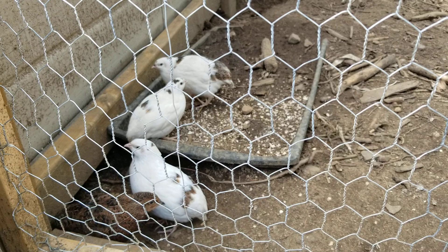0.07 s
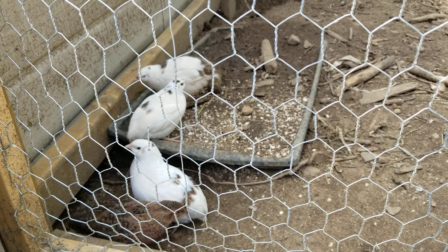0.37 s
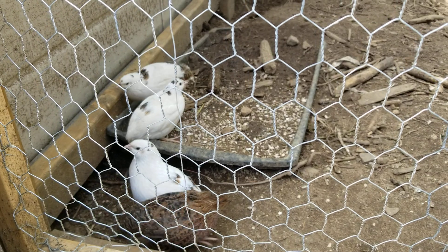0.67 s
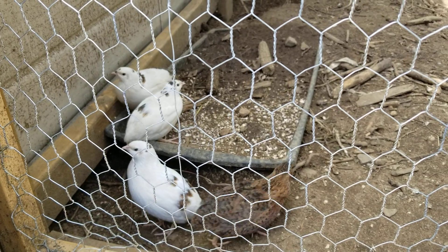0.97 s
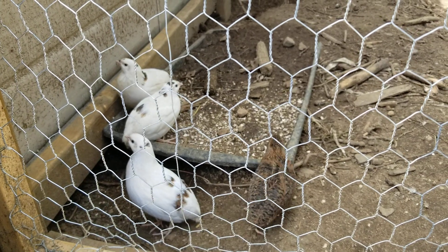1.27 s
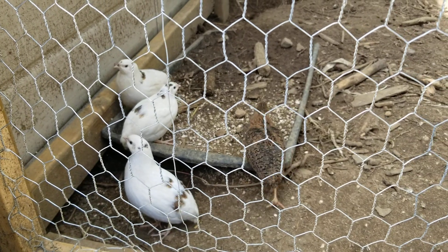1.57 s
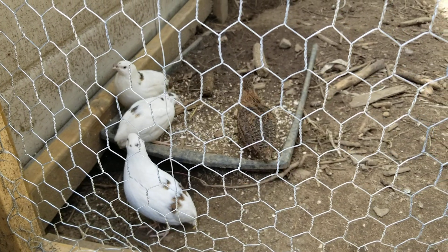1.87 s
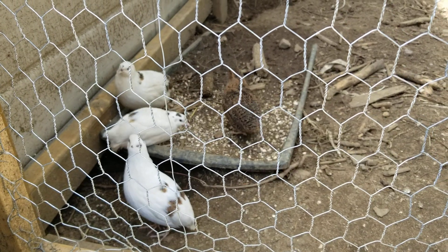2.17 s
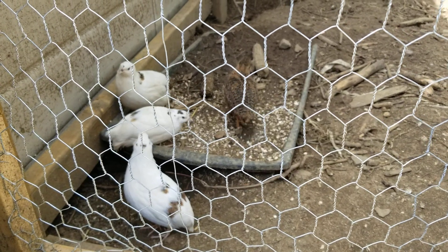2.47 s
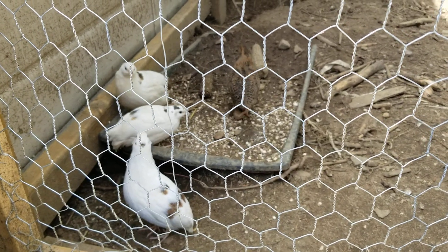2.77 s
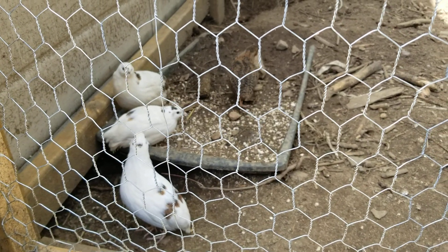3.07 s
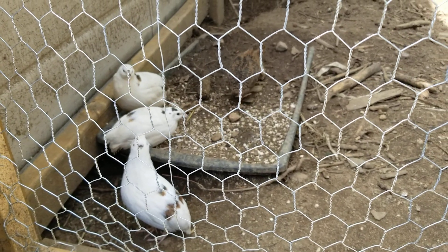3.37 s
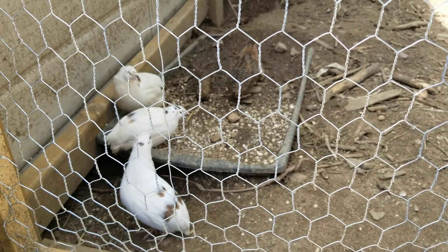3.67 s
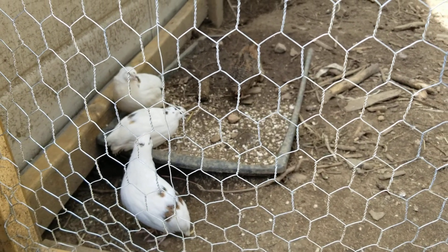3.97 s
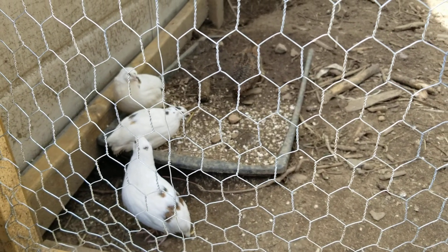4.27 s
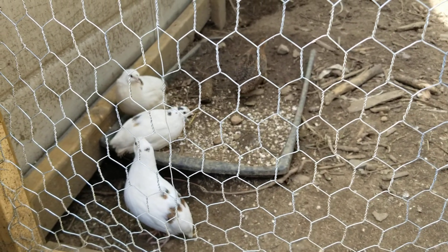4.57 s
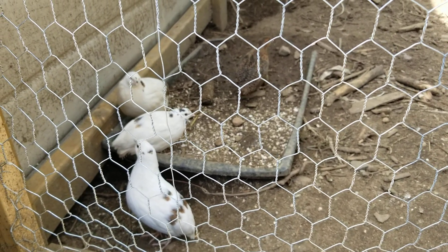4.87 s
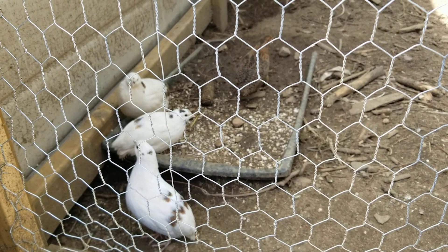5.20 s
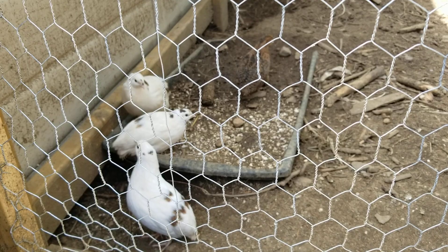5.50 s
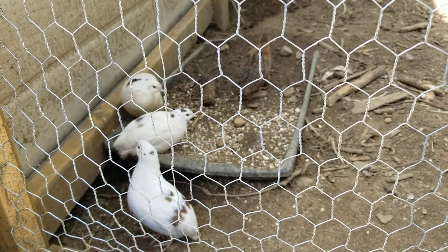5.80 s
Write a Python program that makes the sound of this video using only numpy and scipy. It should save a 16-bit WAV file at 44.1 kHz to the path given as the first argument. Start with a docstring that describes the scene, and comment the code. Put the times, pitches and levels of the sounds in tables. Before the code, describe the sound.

A low rumble of distant traffic with soft road hiss runs throughout, around an outdoor quail pen. It starts quietly. At about 0.7 seconds a far songbird gives a falling whistle that echoes around the yard. From 0.9 to 1.3 seconds quail feet tick and scratch on a feed tray, ringing lightly, with a few dull bumps and one more tick at 1.6. Around 2 seconds there is a faint high swish, and the whole scene grows clearly louder, with a short click at 2.4. Thin, very high bird calls come near 3 seconds, along with two brief chips. Another falling whistle sounds at 4 seconds. From 4.3 to 5.4 a songbird sings four quick arched notes, two louder rising swoops and a fading downward sweep. More thin calls overlap it, and a few tray ticks follow at 5.5. The right side sounds muffled.

```python
"""Quail pen with songbirds and distant traffic

Quail potter about a wire pen, their feet ringing the modes of a feed tray, over a rumble of traffic.
Songbirds give two long falling whistles and a swooping phrase, near sines from the syrinx that echo
round the yard; small birds add thin, very high calls. The right microphone is muffled, and the level
of the scene comes up at about two seconds."""
import sys
import numpy as np
from scipy import signal
from scipy.fft import rfft, irfft
from scipy.io import wavfile

SR = 44100
rng = np.random.default_rng(int(sys.argv[2]) if len(sys.argv) > 2 else 0)


def put_to_file(sound):
    """Save the sound as 16-bit audio at rate SR, in the file named by the first command-line argument."""
    columns = np.atleast_2d(sound).T  # one column per channel
    safe = np.clip(columns, -1, 1)
    whole_steps = np.round(safe * 32767)
    wavfile.write(sys.argv[1], SR, whole_steps.astype(np.int16))


N = 266364
TIME = np.arange(N) / SR
FREQ = np.fft.rfftfreq(N, 1 / SR)
PROGRESS = np.linspace(0, 1, 64)  # from the start of a note to its end


def undb(db):
    """Amplitude ratio of a level in decibels."""
    return 10 ** (np.asarray(db) / 20)


def unit(x):
    """Normalisation to an rms of 1."""
    return x / np.sqrt(np.mean(x ** 2))


def curves(rows):
    """Linear interpolation of each column against the first, time_s."""
    times, *columns = np.transpose(rows)
    return [np.interp(TIME, times, column) for column in columns]


def colour(x, points):
    """Spectral shaping by (frequency_hz, gain_db) points."""
    hz, db = np.transpose(points)
    return irfft(rfft(x) * undb(np.interp(np.log(FREQ + 1), np.log(hz), db)), N)


def resonate(x, hz, width_hz):
    """A second-order resonance with unit gain at its centre."""
    return signal.lfilter(*signal.iirpeak(hz, hz / width_hz, fs=SR), x)


def walk(rate_hz):
    """Random fluctuation: low-passed noise with an rms of 1."""
    return unit(irfft(rfft(rng.standard_normal(N)) * np.exp(-(FREQ / rate_hz) ** 2), N))


def decay(start_s, t60_s):
    """Exponential decay from start_s, by 60 dB in t60_s."""
    age = TIME - start_s
    return (age >= 0) * np.exp(-np.log(1000) * np.clip(age / t60_s, 0, 10))


# spectrum of far engines: frequency_hz, gain_db
RUMBLE_SPECTRUM = [(13, -60), (22, -53), (53, 0), (75, 1), (135, -1), (228, -12), (300, -12.5),
                   (508, -19.5), (600, -17.5), (780, -17.5), (1320, -120)]
# spectrum of road noise and outdoor hiss: frequency_hz, gain_db
ROAD_SPECTRUM = [(120, -3), (235, -6.5), (450, -10.5), (680, -2.5), (950, -1.5), (1300, -2), (1850, -3.5),
                 (2400, -10), (3700, -10.5), (4500, -12.5), (5300, -12.5), (6400, -7), (7000, -11.5),
                 (7700, -21.5), (8800, -27.5), (9700, -21), (12000, -26.5), (15500, -41)]
# swell and ebb of the traffic: time_s, rumble_gain_db, road_gain_db
TRAFFIC_SWELL = [(0, 4, 1.5), (1.5, 0.5, -1.5), (3.0, 2, 0), (4.2, 2.5, -0.15), (6, 1, 0)]
# one distant engine: time_s, pitch_hz, level_db
ENGINE_DRONE = [(0, 153.2, -52.5), (2.7, 154.1, -55.5), (3.4, 145, -59.5), (3.9, 129, -57.5),
                (5.4, 124.7, -57.5), (6, 129, -64)]
def traffic():
    """Engine rumble and drone reach both microphones alike; road noise forms a diffuse field."""
    rumble_db, road_db = curves(TRAFFIC_SWELL)
    eddies_db = 0.9 * walk(8)
    rumble = unit(colour(rng.standard_normal(N), RUMBLE_SPECTRUM)) * undb(-48.5 + rumble_db + eddies_db)
    drone_hz, drone_db = curves(ENGINE_DRONE)
    phase = 2 * np.pi * np.cumsum(drone_hz * (1 + 0.0252 * walk(17.2))) / SR
    drone = np.sin(phase) * undb(drone_db + 3.5 * walk(9.3))
    diffuse = unit(colour(rng.standard_normal((2, N)), ROAD_SPECTRUM))
    # long waves are partly coherent between the microphones
    coherent = colour(diffuse[0] + diffuse[1], [(300, -15.5), (700, -18), (1400, -24), (3000, -55)])
    road = unit(diffuse + coherent) * undb(-46 + road_db + 0.54 * walk(2.9))
    return rumble + drone + road


def syrinx(notes, waver, flutter_db, rasp, edge_s):
    """A gliding sine with random frequency and amplitude modulation; fast jitter makes it rasp."""
    out = np.zeros(N)
    pitch_ratio = 1 + waver * walk(82) + rasp * walk(1500)
    tremble_db = flutter_db * walk(70)
    for times, hz, db in notes:
        on = (TIME >= times[0]) & (TIME <= times[-1])
        t = TIME[on]
        phase = 2 * np.pi * np.cumsum(np.interp(t, times, hz) * pitch_ratio[on]) / SR
        edges = np.clip(np.minimum(t - times[0], times[-1] - t) / edge_s, 0, 1)
        out[on] += edges * undb(np.interp(t, times, db) + tremble_db[on]) * np.sin(phase)
    return out


# lower voice of the thin calls, one contour a call: time_s, pitch_hz, level_db
LOWER_VOICE = [
    [(0.575, 11000, -84), (0.657, 11569, -86), (0.801, 11273, -80), (0.835, 12500, -76),
     (0.877, 12454, -76), (0.947, 10638, -74), (0.98, 10045, -89)],
    [(2.71, 9748, -72), (2.75, 11600, -59), (2.804, 11630, -65), (2.88, 10950, -60.5), (2.902, 11408, -73),
     (2.914, 11779, -64), (2.956, 10842, -65), (3.018, 10500, -75), (3.07, 9987, -74)],
    [(4.968, 9530, -70), (4.996, 10945, -67), (5.106, 11500, -77), (5.186, 11797, -67), (5.232, 11350, -74),
     (5.254, 11100, -70), (5.4, 10202, -84)],
    [(5.47, 10456, -68), (5.494, 11150, -58), (5.513, 10093, -83)],
]
# flat-topped arches above the long calls: start_s, length_s, top_hz, level_db
UPPER_ARCHES = [(.445, .565, 13800, -89), (2.76, .45, 12600, -78), (4.951, .485, 13270, -73.5)]
def small_birds():
    """Biphonation: one side of the syrinx gives a firm lower voice, the other a broken upper one."""
    stray_ratio = 1 + 0.011 * walk(16)
    breaks_db = 5 * walk(22)
    sag = np.abs(2 * PROGRESS - 1) ** 3.6  # the higher the power, the flatter the top
    arches = []
    for start_s, length_s, top_hz, level_db in UPPER_ARCHES:
        times = start_s + length_s * PROGRESS
        hz = (top_hz - 2500 * sag) * np.interp(times, TIME, stray_ratio)
        db = level_db - 3 * sag + np.interp(times, TIME, breaks_db)
        arches.append((times, hz, db))
    calls = [np.transpose(call) for call in LOWER_VOICE]
    lower = syrinx(calls, waver=0.003, flutter_db=3, rasp=0.01, edge_s=0.005)
    upper = syrinx(arches, waver=0.0018, flutter_db=2, rasp=0.013, edge_s=0.0069)
    airy_edge = [(times, hz * 1.2, db - 2) for times, hz, db in arches]
    sizzle = syrinx(airy_edge, waver=0.015, flutter_db=3, rasp=0.035, edge_s=0.03)
    # inverse gain: the contour levels are as heard, after the level of the scene comes up
    return (lower + upper + sizzle) / undb(curves(OVERALL_GAIN)[0])


def glide(start_s, length_s, first_hz, last_hz, level_db, bend, taper_db):
    """Exponential glide as (times, hz, db): early if bend > 0, late if bend < 0, softer at the ends."""
    slide = np.expm1(-bend * PROGRESS) / np.expm1(-bend)
    hz = first_hz + (last_hz - first_hz) * slide
    db = level_db - taper_db * (2 * PROGRESS - 1) ** 2
    return start_s + length_s * PROGRESS, hz, db


# two long whistles and two brief chips: start_s, length_s, first_hz, last_hz, level_db
FALLING_WHISTLES = [(0.65, .18, 3680, 2394, -40), (2.854, 0.038, 7080, 6650, -44.5),
                    (3.632, .027, 3600, 3200, -46), (3.986, .235, 3774, 2176, -39.5)]
def far_birds():
    """Nearly pure tones that sweep down almost linearly in frequency."""
    notes = [glide(*row, bend=0.207, taper_db=7) for row in FALLING_WHISTLES]
    return syrinx(notes, waver=0.004, flutter_db=2.5, rasp=0.0057, edge_s=0.0044)


# dull bumps on the pen: start_s, level_db, pitch_hz, t60_s
PEN_KNOCKS = [(.906, -35.5, 678, 0.062), (1.063, -36.5, 794, .08), (1.071, -35, 607, 0.072),
              (2.430, -23, 500, 0.0084), (2.433, -25, 1690, .007)]
def pen_knocks():
    """Each impact excites one damped mode; the longer rings also build up more slowly."""
    out = np.zeros(N)
    for start_s, level_db, pitch_hz, t60_s in PEN_KNOCKS:
        envelope = decay(start_s, t60_s) - decay(start_s, t60_s / 5)
        out += undb(level_db) * envelope * np.sin(2 * np.pi * pitch_hz * (TIME - start_s))
    return out


# claws and grains striking the tray: start_s, level_db, scratch_gain_db
TRAY_TICKS = [(.926, -37, 6), (.941, -36, 2), (.951, -43, 9), (1.001, -41, -3), (1.021, -41, 6.5),
              (1.078, -30, -17), (1.092, -39, 2), (1.12, -35, -14), (1.132, -38, -7), (1.164, -39, -2),
              (1.171, -36, -12), (1.243, -31, -6), (1.637, -34, -14), (5.519, -34.5, -1), (5.528, -44, 8),
              (5.534, -36, 2)]
# resonances of the tray: frequency_hz, bandwidth_hz, gain_db
TRAY_MODES = [(2220, 170, -4.5), (2650, 51, -2.5), (2970, 150, -16)]
def feet_on_tray():
    """Impulse excitation: each touch rings the tray's modes, with a short, bright scratch on top."""
    taps, envelope = np.zeros(N), np.zeros(N)
    for start_s, level_db, scratch_gain_db in TRAY_TICKS:
        taps[int(start_s * SR)] += undb(level_db)
        envelope += undb(level_db + scratch_gain_db) * decay(start_s, t60_s=0.015)
    # neighbouring modes swing in antiphase, so the ring builds up softly
    ring = sum((-1) ** k * undb(db) * resonate(taps, hz, width_hz)
               for k, (hz, width_hz, db) in enumerate(TRAY_MODES))
    scratch_spectrum = [(3000, -37), (6000, -5), (7300, 2.5), (9000, -7), (12000, -7), (15500, -30)]
    scratch = colour(envelope * rng.standard_normal(N), scratch_spectrum)
    return undb(28) * ring + scratch


def feed_rustle(peak_s=1.99, spread_s=0.09, centre_hz=11600, width_hz=1200):
    """Friction noise: a bird brushes through the feed in one soft, high swish."""
    hiss = resonate(rng.standard_normal(N), centre_hz, width_hz)
    hiss = resonate(hiss, centre_hz, width_hz)
    return undb(-66) * unit(hiss) * np.exp(-((TIME - peak_s) / spread_s) ** 2)


# arched notes on a steady beat: start_s, level_db
SONG_ARCHES = [(4.293, -49.5), (4.459, -41.5), (4.628, -40.5), (4.795, -39.5)]
# two like swoops: start_s, level_db
SONG_SWOOPS = [(4.921, -30.5), (5.118, -34)]
# a swoop dips, climbs and is loudest near the top: age_s, pitch_hz, gain_db
SWOOP_CONTOUR = [(0, 3650, -18), (.034, 2950, -19.5), (.052, 3620, -10), (.084, 4200, -8.5),
                 (.11, 4900, -17), (.126, 5850, -6.5), (.135, 6300, 2.5), (.145, 6450, -24)]
def songbird():
    """Frequency modulation draws a phrase: pips and arches, two rising swoops, a fading downsweep."""
    notes = []
    for start_s, level_db in SONG_ARCHES:
        pip = glide(start_s - 0.034, 0.027, 5380, 5230, level_db - 5.5, bend=-3.5, taper_db=8)
        times, hz, db = glide(start_s, 0.079, 4640, 3440, level_db, bend=-2.2, taper_db=0.5)
        age = times - start_s
        scoop_hz = 493 * np.exp(-age / 0.00677)  # the arch slides up into its pitch
        dip_db = 12 * np.exp(-((age - 0.031) / 0.016) ** 2)  # and weakens just past its top
        notes += [pip, (times, hz - scoop_hz, db - dip_db)]
    age, hz, db = np.transpose(SWOOP_CONTOUR)
    notes += [(start_s + age, hz, level_db + db) for start_s, level_db in SONG_SWOOPS]
    times, hz, db = glide(start_s=5.308, length_s=0.1, first_hz=7370, last_hz=3040,
                          level_db=-33.5, bend=1.9, taper_db=1.5)
    notes.append((times, hz, db - 14 * PROGRESS))
    return syrinx(notes, waver=0.0111, flutter_db=5, rasp=0.014, edge_s=0.0049)


def yard(direct, early_db, early_t60_s, late_db, late_t60_s):
    """Reverberation in stereo: early scatter off the pen and walls, a late tail off fences and trees."""
    out = direct
    for db, t60_s in (early_db, early_t60_s), (late_db, late_t60_s):
        # cubing the noise makes single reflections stand out
        scatter = (rng.standard_normal((2, N)) ** 3 * decay(0.0072, t60_s))[:, :SR]
        scatter /= np.sqrt(np.sum(scatter ** 2, axis=1, keepdims=True))
        out = out + undb(db) * signal.fftconvolve(direct[None], scatter, axes=1)[:, :N]
    return out


def scene():
    """Superposition of all sources; the further the bird, the lower its direct-to-reverberant ratio."""
    falls = yard(far_birds(), early_db=-10, early_t60_s=0.1, late_db=2, late_t60_s=0.82)
    song = yard(songbird(), early_db=-3, early_t60_s=0.13, late_db=-2.5, late_t60_s=0.55)
    thin_calls = yard(small_birds(), early_db=-8, early_t60_s=0.05, late_db=-9, late_t60_s=0.35)
    birds = undb(-6) * falls + undb(-4.5) * song + undb(9) * thin_calls
    return birds + feet_on_tray() + pen_knocks() + traffic() + feed_rustle()


# response of the muffled right microphone port: frequency_hz, gain_db
RIGHT_RESPONSE = [(100, 0.5), (350, -1.5), (700, -4.5), (1400, -6), (2200, -8.5), (2900, -6), (3700, -18.5),
                  (5200, -17), (6300, -47.5), (10000, -30)]
# a quick fade-in, then a rise at about two seconds: time_s, gain_db
OVERALL_GAIN = [(0, -80), (.064, -53.5), (.071, -15.5), (1.75, -11), (2.3, -4), (2.85, 0.5), (6.04, 0.5)]
def record(dry, cutoff_hz=15700):
    """Transfer function of the microphones: a muffled right port, faint hiss, rising gain, a low-pass."""
    hiss_spectrum = [(6000, -24), (10000, -18), (12500, -3), (15500, -2)]
    hiss = unit(colour(rng.standard_normal((2, N)), hiss_spectrum))
    ports = np.array([dry[0], colour(dry[1], RIGHT_RESPONSE)]) + undb(-71.5) * hiss
    lowpass = signal.ellip(10, 0.2, 70, cutoff_hz, fs=SR, output="sos")
    return signal.sosfilt(lowpass, ports * undb(curves(OVERALL_GAIN)[0]))


dry = scene()
out = record(dry)
put_to_file(out)
```